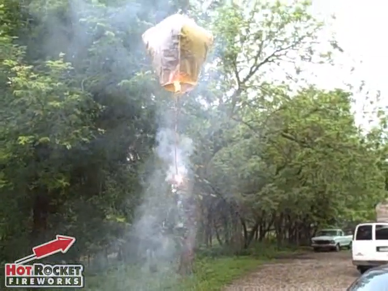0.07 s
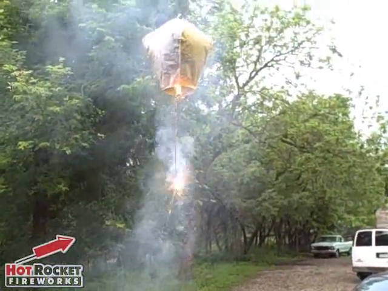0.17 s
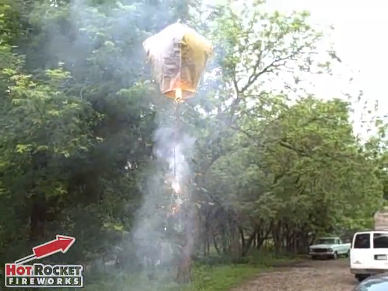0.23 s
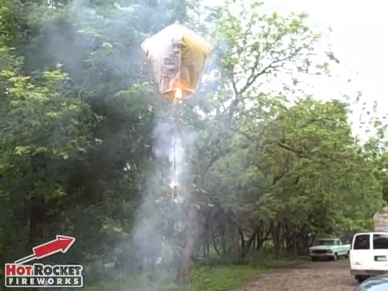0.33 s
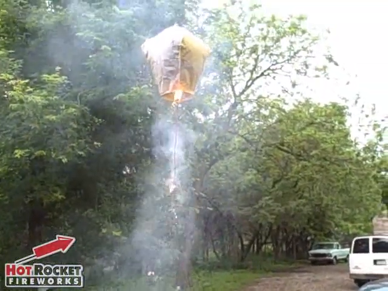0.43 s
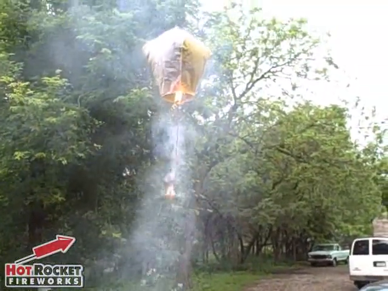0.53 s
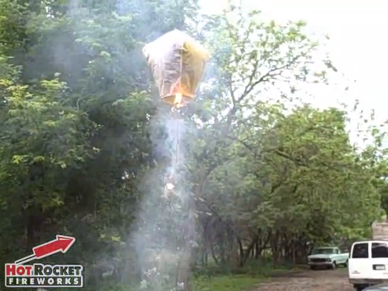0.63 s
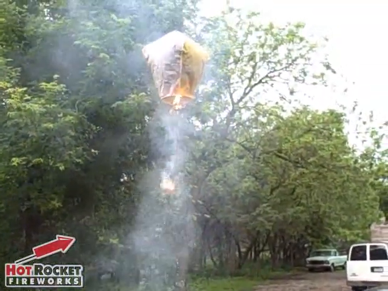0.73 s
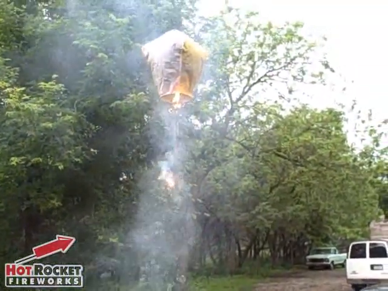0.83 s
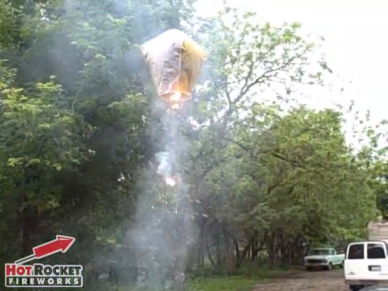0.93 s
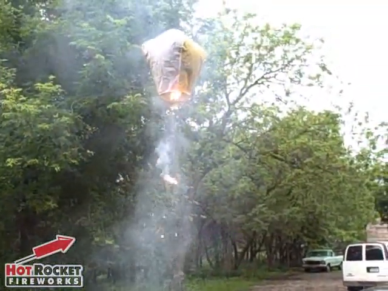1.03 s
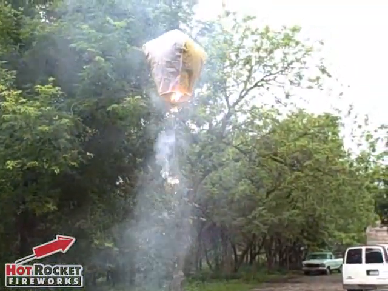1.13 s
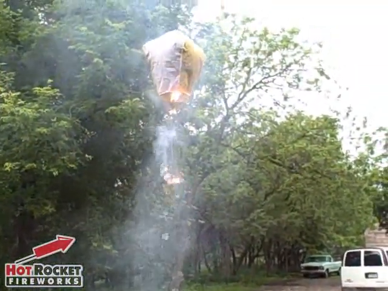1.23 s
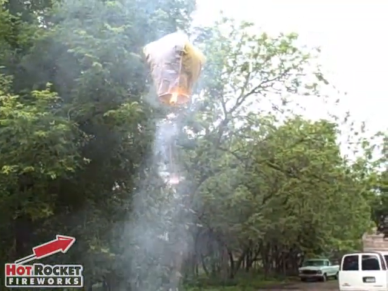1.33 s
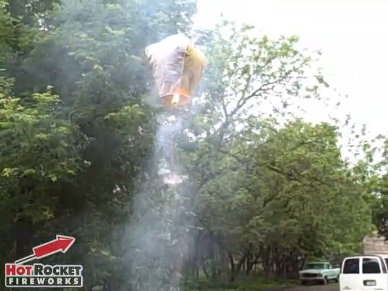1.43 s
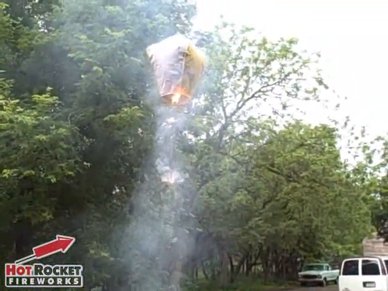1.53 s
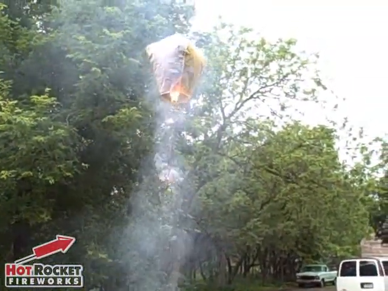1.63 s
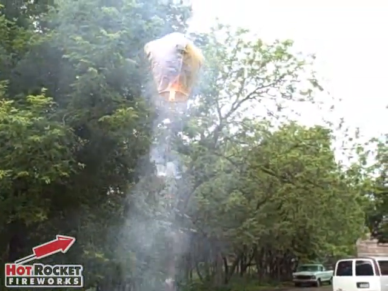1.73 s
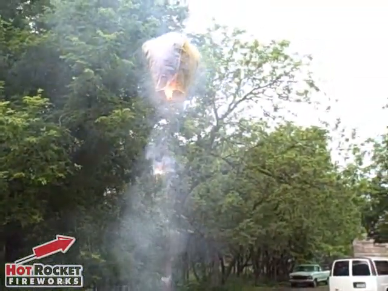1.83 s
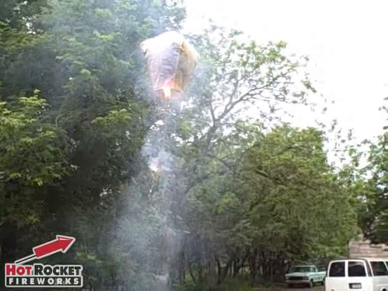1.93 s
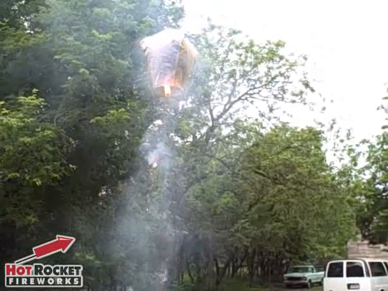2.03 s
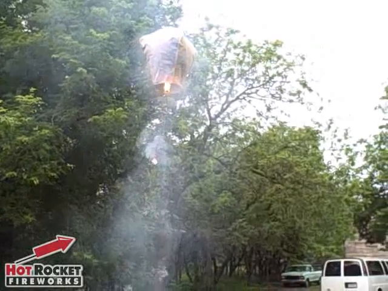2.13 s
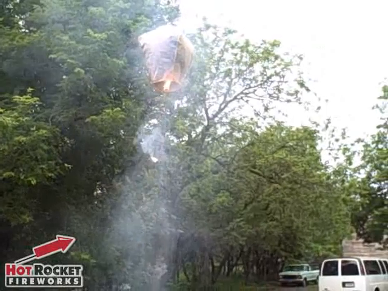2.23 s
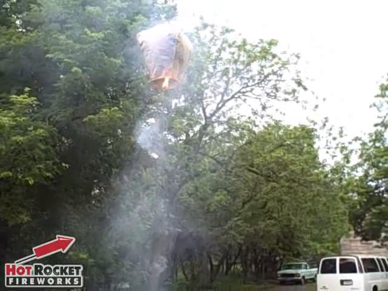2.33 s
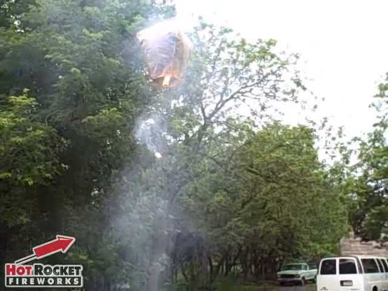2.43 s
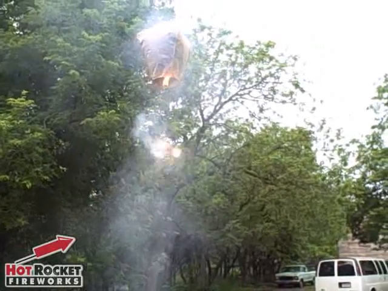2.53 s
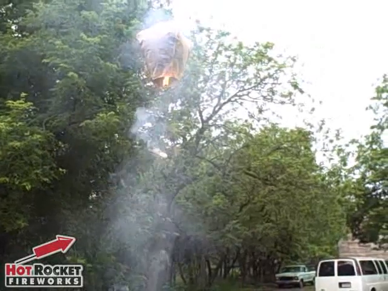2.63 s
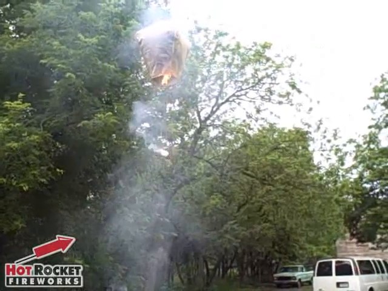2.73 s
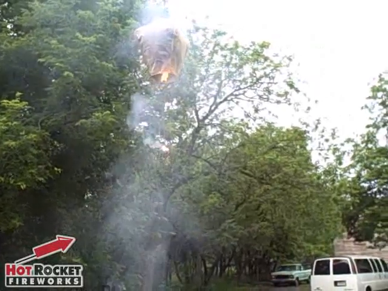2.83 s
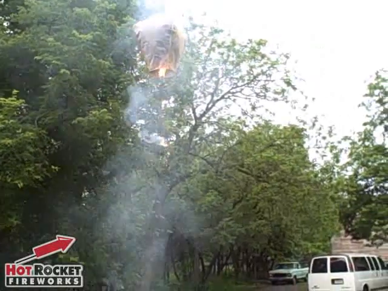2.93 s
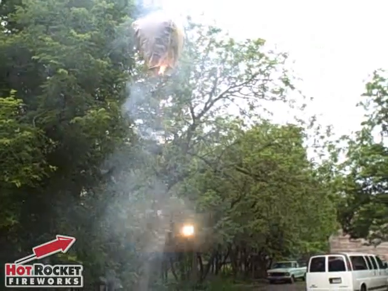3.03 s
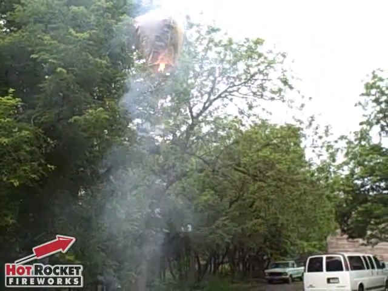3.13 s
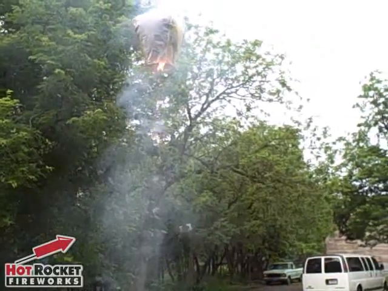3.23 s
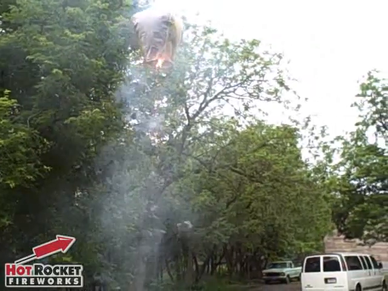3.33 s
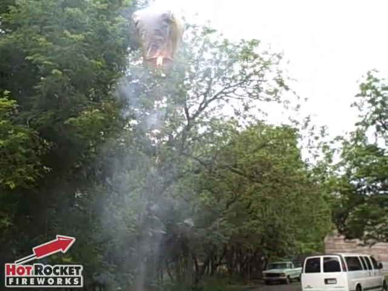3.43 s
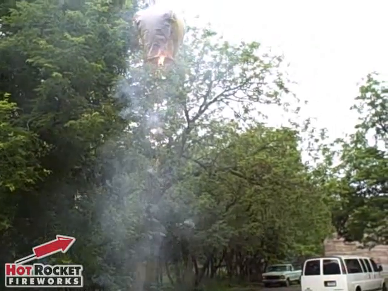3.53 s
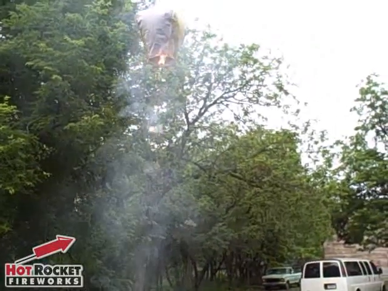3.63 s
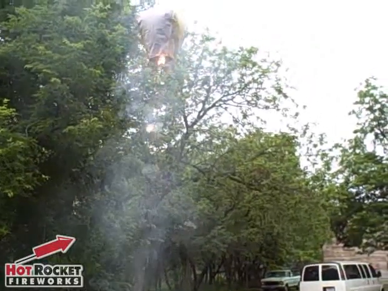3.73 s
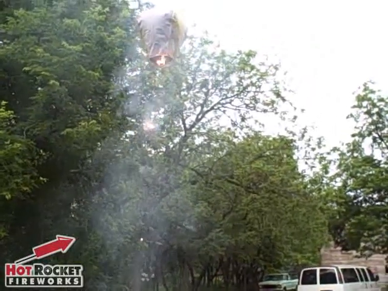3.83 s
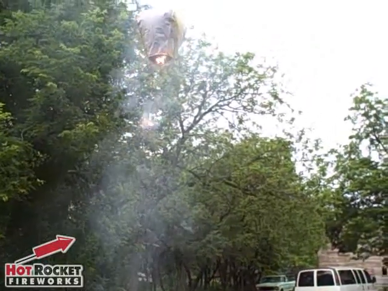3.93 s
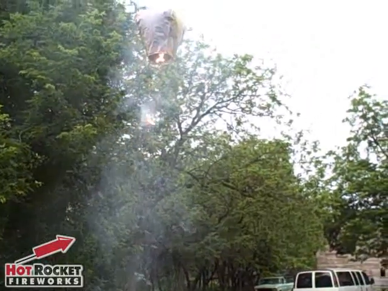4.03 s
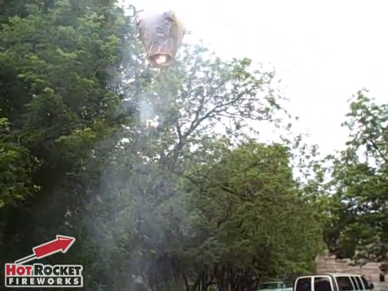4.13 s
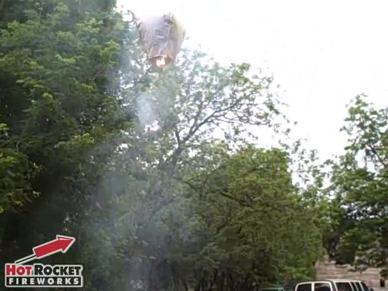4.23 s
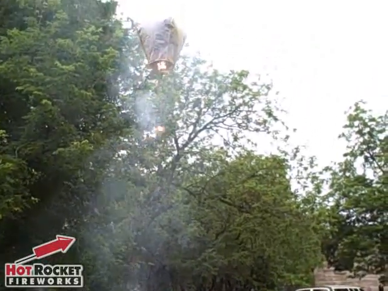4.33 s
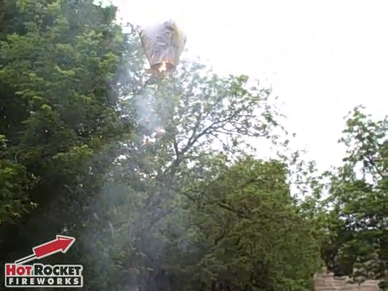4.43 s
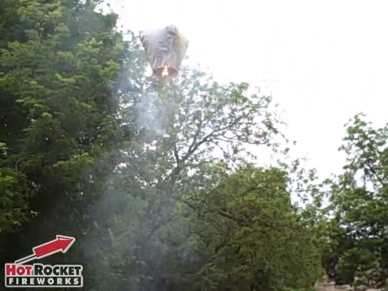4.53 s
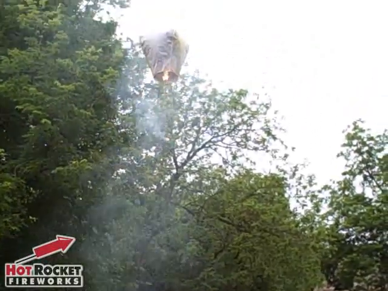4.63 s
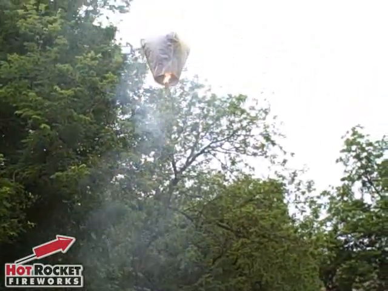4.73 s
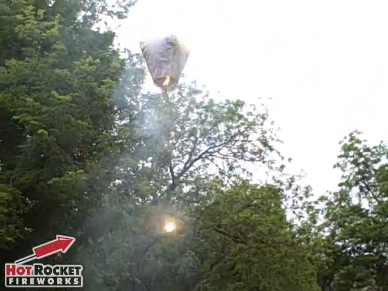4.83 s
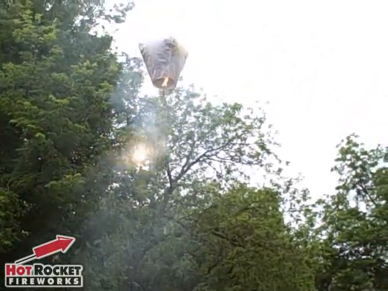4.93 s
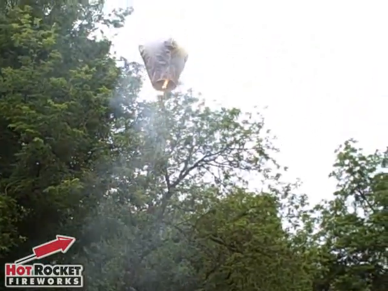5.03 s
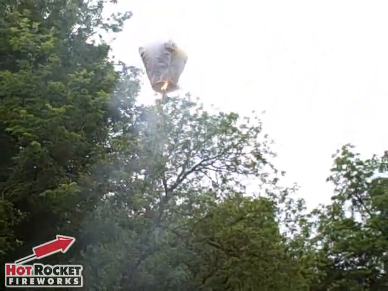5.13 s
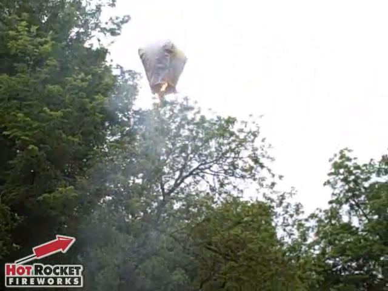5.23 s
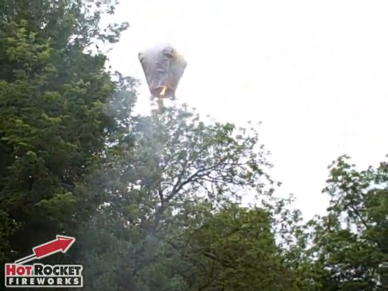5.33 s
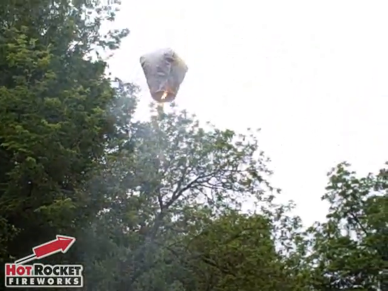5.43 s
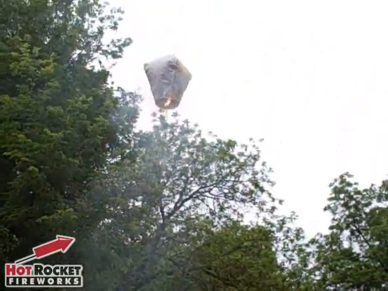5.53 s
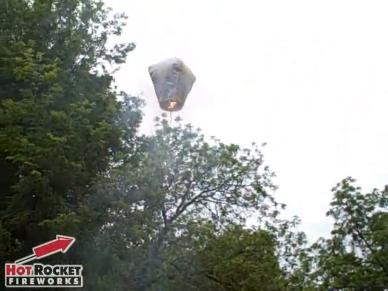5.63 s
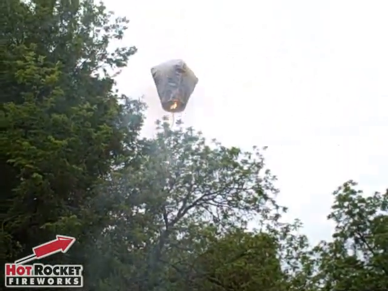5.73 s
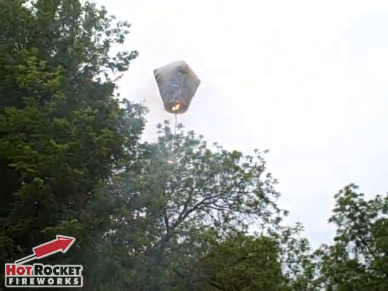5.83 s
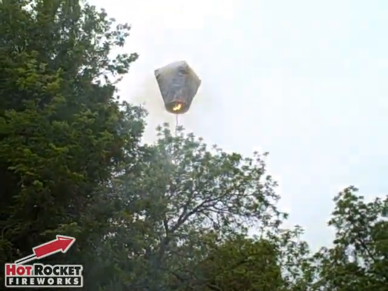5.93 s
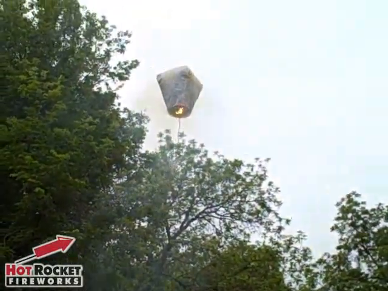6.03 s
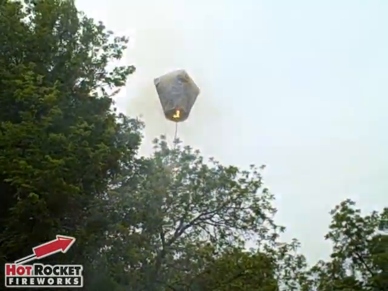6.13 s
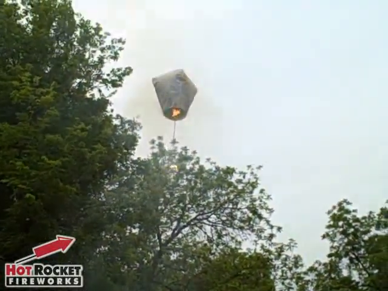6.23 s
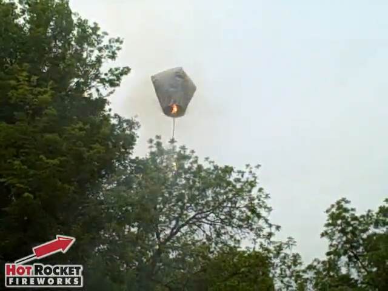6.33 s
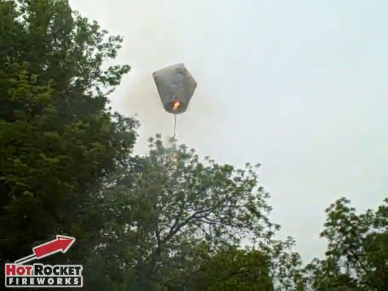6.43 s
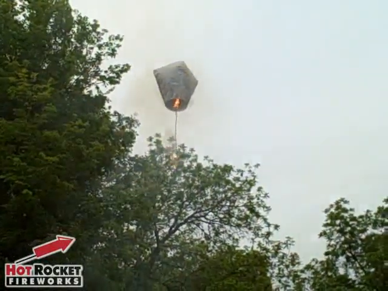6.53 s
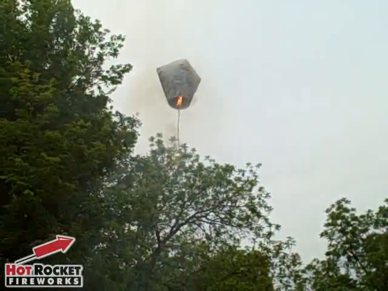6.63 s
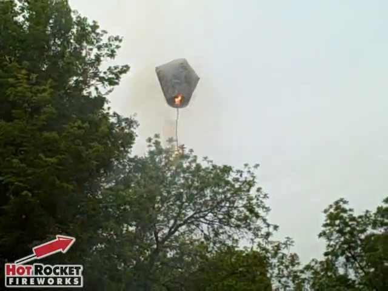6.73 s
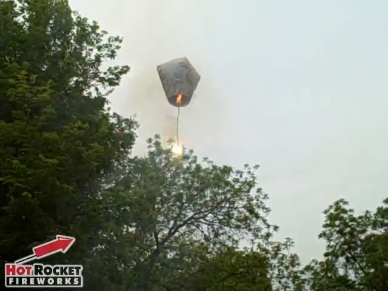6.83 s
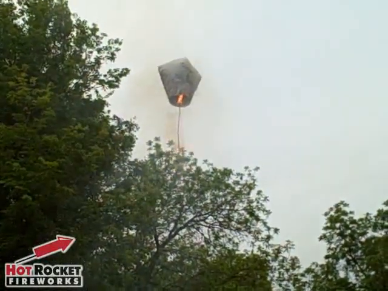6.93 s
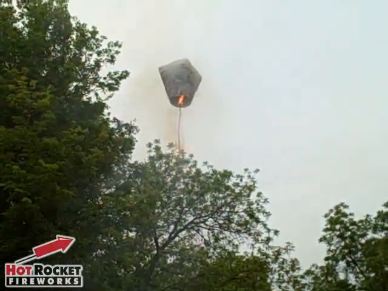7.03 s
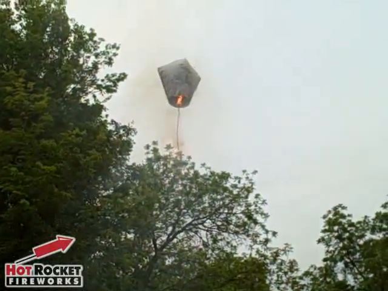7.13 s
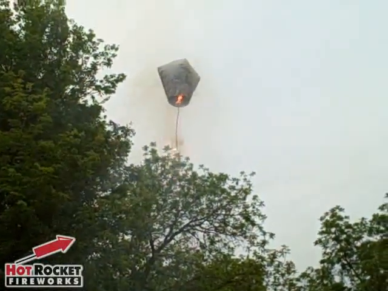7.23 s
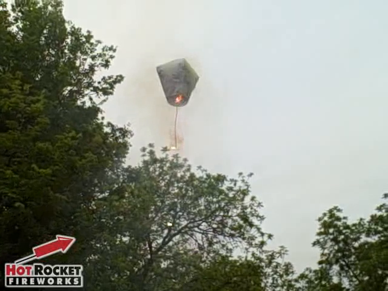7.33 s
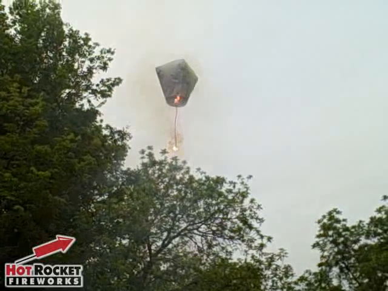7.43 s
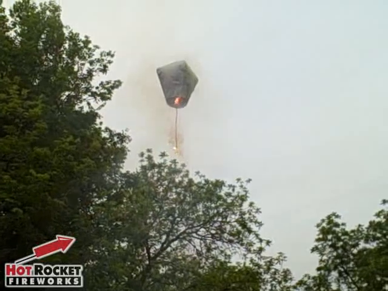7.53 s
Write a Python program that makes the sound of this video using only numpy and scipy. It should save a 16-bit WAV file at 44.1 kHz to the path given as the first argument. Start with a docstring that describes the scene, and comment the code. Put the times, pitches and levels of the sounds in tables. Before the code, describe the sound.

Dry, sharp firecracker pops crackle densely outdoors, thin to a brief gap, then resume sparsely with leafy echoes over low wind rumble.

```python
"""A crackling cord hangs under a paper lantern that climbs away between trees.
It opens in dense crackle over the strongest wind rumble, thins out to a gap just after 5 s, where a far
bird whistles briefly near 5.9 s, then crackles again to 7.5 s as the wind swells. Each charge sends in turn
a blast wave, its ground bounce with a soft thump, a hiss of leaf echoes (filtered noise, decaying by band)
and duller slaps from a near and a far obstacle. A faint noise hush lies below throughout."""
import sys
import numpy as np
from scipy import signal
from scipy.io import wavfile

SR = 44100
rng = np.random.default_rng(int(sys.argv[2]) if len(sys.argv) > 2 else 0)


def persist_wave(psi):
    """Save psi, clipped to +-1, as 16-bit WAV."""
    counts = np.round(np.clip(psi, -1, 1) * 32767).astype(np.int16)
    wavfile.write(sys.argv[1], SR, np.atleast_2d(counts).T)


N = 333837

# charges: (time [s], size as echo level [dB], front height [dB], treble re middle [dB],
#           ground bounce lag [ms], bounce re front [dB])
CHARGES = [(0.0254, -29.4, -2.0, -10, 3.69, -2), (0.05, -31.8, -5.4, -2, 3.42, -13),
           (0.0629, -27.3, -3.6, -11, 3.51, -2), (0.0708, -28.8, -2.4, -8, 1.89, 0),
           (0.077, -35.0, -6.4, -8, 4.0, -7), (0.085, -33.0, -3.6, -9, 3.99, -1),
           (0.111, -27.6, -2.1, -9, 1.35, 0), (0.1358, -34.1, -10.5, -6, 3.29, 2),
           (0.2216, -27.0, -0.7, -8, 1.0, -15), (0.2262, -30.0, 0.4, -5, 3.5, -15),
           (0.2387, -35.0, -4.7, -5, 3.98, -3), (0.3416, -35.8, -16.5, 5, 4.09, 3),
           (0.3808, -30.6, -3.9, -10, 2.76, -3), (0.3886, -39.0, -12.4, -5, 3.85, -2),
           (0.4356, -35.1, -9.0, -12, 3.76, 0), (0.5848, -31.7, -9.4, -4, 2.64, -2),
           (0.5981, -28.0, -3.8, -14, 4.19, 2), (0.5998, -31.0, -1.5, -11, 4.96, -10),
           (0.616, -28.6, -2.4, -11, 2.69, -1), (0.6361, -36.0, -6.5, -7, 3.44, -4),
           (0.684, -28.3, -2.2, -14, 2.56, -2), (0.7109, -38.0, -10.0, -4, 4.08, -1),
           (0.8207, -30.0, -4.7, -3, 1.0, -1), (0.829, -36.0, -6.7, -9, 3.45, -1),
           (0.8704, -48.0, -21.1, -3, 4.25, -3), (0.9463, -32.0, -6.9, -3, 4.3, 3),
           (0.9506, -33.0, -3.6, -6, 2.05, -4), (1.1984, -36.1, -9.6, -2, 3.86, -2),
           (1.3419, -38.0, -22.1, 10, 4.31, 3), (1.3694, -27.0, -1.1, -17, 3.45, -2),
           (1.3777, -35.0, -5.9, -11, 4.09, -6), (1.403, -31.5, -6.6, -8, 2.61, -3),
           (1.409, -37.0, -9.4, -5, 4.18, -5), (1.4298, -34.7, -7.9, -2, 4.57, -5),
           (1.539, -31.5, -3.0, -9, 3.47, -2), (1.6495, -46.4, -23.1, 7, 4.49, 0),
           (1.746, -32.0, -2.8, -12, 3.91, -4), (1.8941, -29.5, -1.2, -18, 2.82, -3),
           (1.9029, -38.0, -15.1, 1, 4.2, -2), (1.9088, -29.0, -0.5, -19, 2.8, -2),
           (1.9594, -35.6, -11.3, -3, 3.96, -1), (1.9658, -36.9, -10.5, -5, 3.96, -2),
           (2.1431, -28.9, -2.1, -12, 2.51, -1), (2.1732, -30.7, -6.1, -9, 1.0, 2),
           (2.2025, -31.4, -4.0, -10, 2.91, -5), (2.2351, -35.4, -15.6, 1, 1.37, 4),
           (2.2475, -34.7, -6.1, -5, 3.97, -2), (2.4607, -33.7, -5.1, -8, 4.02, -2),
           (2.6591, -34.9, -15.2, 8, 4.89, 4), (2.7142, -47.0, -19.9, -4, 4.54, 4),
           (2.7191, -41.0, -10.2, -12, 4.89, -5), (2.836, -34.5, -6.6, -4, 5.06, -6),
           (3.0863, -34.9, -11.7, -4, 4.85, -3), (3.1317, -32.6, -5.6, -9, 3.9, 0),
           (3.2234, -30.8, -6.9, -12, 3.54, 3), (3.2445, -30.3, -4.5, -11, 4.33, 0),
           (3.3259, -40.6, -17.4, 1, 5.1, 1), (3.3319, -49.0, -17.3, -12, 4.8, -9),
           (3.5603, -33.2, -9.6, -5, 4.84, 0), (3.6587, -36.1, -10.6, -6, 4.66, -3),
           (3.7268, -31.0, -2.7, -13, 2.13, -2), (3.7511, -41.9, -14.3, -1, 5.28, -7),
           (3.942, -30.7, -3.3, -12, 2.95, 0), (3.9531, -34.4, -9.1, -3, 5.43, -3),
           (3.9817, -38.6, -11.7, -6, 3.02, 1), (4.0548, -36.9, -12.5, -5, 5.42, -1),
           (4.2097, -52.8, -28.6, 1, 5.69, 0), (4.2966, -34.5, -7.4, -6, 4.51, -7),
           (4.3545, -32.8, -9.8, -7, 5.0, 1), (4.3895, -34.2, -8.7, -8, 5.3, 0),
           (4.4107, -37.4, -14.9, -5, 5.43, 0), (4.4448, -31.4, -2.3, -13, 4.16, -4),
           (4.4901, -42.4, -18.0, -2, 4.86, 1), (4.4958, -47.0, -19.9, -5, 4.87, -2),
           (4.546, -40.2, -14.1, -12, 5.7, -1), (4.7601, -41.1, -18.0, -1, 5.82, -1),
           (5.0233, -36.0, -11.0, -5, 4.69, -5), (5.0537, -40.1, -15.1, -14, 5.98, -2),
           (5.0745, -37.7, -9.1, -8, 5.96, -6), (5.1304, -42.0, -21.0, -1, 5.04, -2),
           (5.143, -44.4, -25.7, 5, 4.88, 0), (5.1693, -45.3, -17.8, -4, 5.98, -7),
           (5.9649, -26.2, -2.3, -9, 6.27, -3), (5.9677, -42.0, -16.2, -6, 5.91, -4),
           (6.0975, -49.4, -18.8, -11, 6.53, -6), (6.3657, -28.1, -1.0, -15, 6.23, -5),
           (6.3891, -37.0, -10.2, -1, 6.36, -4), (6.522, -28.0, -4.0, -11, 5.48, -2),
           (6.5666, -37.8, -10.3, -5, 6.33, -5), (6.6875, -53.0, -20.7, -12, 6.75, -7),
           (6.7311, -28.5, -2.1, -9, 6.35, -1), (6.7344, -32.0, -5.1, -4, 6.69, -5),
           (6.8526, -29.1, -1.9, -12, 6.05, -5), (6.8845, -29.7, -2.1, -12, 6.69, -4),
           (7.0206, -42.6, -16.6, -2, 6.84, -3), (7.1589, -34.4, -9.3, -8, 6.47, -1),
           (7.3113, -43.0, -13.6, -13, 6.5, -4), (7.477, -24.8, -3.1, -11, 4.88, 1),
           (7.5254, -29.7, -1.9, -11, 5.91, -4)]
# microphone rings struck by a steep front: (frequency [Hz], decay to 1/e [ms], level re treble [dB])
CAPSULE_RINGS = [(14600, .11, -1), (8200, .15, -9)]
# leaf echo colour, relative: (frequency [Hz], level [dB per Hz])
LEAF_COLOUR = [(35, -43), (60, -7), (290, -4), (403, -4), (1010, -5.5), (2040, -3), (2290, -1.5),
               (2900, -5.5), (6760, -4), (15000, -4), (16500, -25)]
# decay of the near crowns: (frequency [Hz], T60 [s])
NEAR_DECAY = [(100, 0.068), (700, 0.17), (2000, 0.1), (5000, 0.33), (13000, 0.19)]
# decay of the far woods: (frequency [Hz], T60 [s])
FAR_DECAY = [(100, .55), (700, 0.83), (2000, 0.89), (5000, 0.93), (13000, 0.54)]
# far woods re near crowns: (frequency [Hz], level [dB])
FAR_LEVEL = [(100, -16), (1000, -15), (4000, -11), (13000, -14.5)]
# obstacles: (slap delay at the start [ms], delay change [ms per s], peak re size [dB],
#             peak change [dB per s], band reference [Hz])
SLAP_OBSTACLES = [(23.9, -.47, 12.0, -.9, 2200), (93.2, -1.55, 4.5, -.2, 4200)]
# wind colour, relative: (frequency [Hz], level [dB per Hz])
WIND_COLOUR = [(12, -30), (20, -3), (48, -2.5), (77, -6), (102, -15.5), (130, -16), (300, -27),
               (390, -68.5), (660, -120)]
# mean wind level: (time [s], level [dB])
WIND_GUSTS = [(0.0, -56), (0.42, -65), (0.84, -65), (1.01, -72), (1.92, -69), (2.07, -66), (2.44, -76),
              (3.27, -71), (3.44, -73), (4.49, -70), (4.68, -74), (5.74, -74), (5.92, -69), (6.68, -64),
              (7.12, -68), (7.57, -64)]
# distant outdoor noise colour, relative: (frequency [Hz], level [dB per Hz])
HUSH_COLOUR = [(88, -30), (150, -6.5), (560, -14), (1230, -13.5), (2810, -16.5), (3490, -12), (6170, -21),
               (15000, -23), (16500, -26)]
# far bird: (time [s], pitch [Hz], mean level [dB])
BIRD_WHISTLE = [(5.83, 2050, -92), (5.86, 2045, -84), (5.93, 2030, -85), (5.96, 2030, -92)]

LEAD_SAMPLES = 8    # shapes start this far ahead of their moment
FRONT_MS, TURN_MS, SUCTION_GAIN = .022, .048, 1.0
BIG_SIZE_DB = -30
USUAL_BODY_DB = -28    # size re front height; a fuller charge has more body behind its front
# big, full charges pull back longer
SUCTION_MS, SUCTION_MS_PER_DB, SUCTION_MS_PER_FULL_DB, SUCTION_LOG_SPREAD = .08, .0015, .003, .12
EARLIER_DB = -30    # scatter left over from charges before the start
SLAP_DELAY_SPREAD, SLAP_SPREAD_DB, SLAP_BAND_LOG_SPREAD = .006, 1.5, .12    # first is a share of the delay
HUSH_DB = -74
HOUSING_ECHO, CUTOFF_HZ = 0.12, 16700    # echo as a share of the direct sound


def cracks():
    """Each charge's direct blast, its more ragged ground bounce and a soft thump of hot gas."""
    s, size_db, front_db, treble_db, lag_ms, bounce_db = np.transpose(CHARGES)
    bigger_db = np.maximum(size_db - BIG_SIZE_DB, -14)
    fuller_db = np.clip(size_db - front_db - USUAL_BODY_DB, -6, 6)
    suction_ms = SUCTION_MS + SUCTION_MS_PER_DB * bigger_db + SUCTION_MS_PER_FULL_DB * fuller_db
    suction_ms = suction_ms * np.exp(SUCTION_LOG_SPREAD * rng.standard_normal(len(s)))
    height = from_db(front_db)[:, None]
    ripple = .08 + from_db(size_db - front_db + 8)[:, None]    # fuller charges burst raggedly
    direct = place(s, height * blast(s, 0.93 * suction_ms, ripple, treble_db))

    bounce_s = s + lag_ms / 1000
    bounce_height = height * from_db(bounce_db)[:, None]
    bounce_shape = blast(bounce_s, 0.71 * suction_ms, 1.9 * ripple, treble_db - 3.0)
    bounce = place(bounce_s, bounce_height * bounce_shape)

    gas = place(s + 12 / SR, from_db(size_db - 2.0)[:, None])
    thump = signal.lfilter([1], [1, -np.exp(-1 / (0.0014 * SR))], gas)    # 1.4 ms decay
    return direct + bounce + thump


def blast(seconds, suction_ms, ripple, treble_db, count=64):
    """A steep short push, a longer pull back and a ragged wake; the microphone turns it over."""
    fraction = (seconds * SR % 1)[:, None]
    ms = (np.arange(count) - LEAD_SAMPLES - fraction) / SR * 1000
    push = np.exp(-.5 * (ms / FRONT_MS) ** 2)
    after_ms = ms - TURN_MS
    opens = .5 + .5 * np.tanh(after_ms / FRONT_MS)
    late_ms = np.maximum(after_ms, 0)
    pull = SUCTION_GAIN * opens * np.exp(-late_ms / suction_ms[:, None])
    wake = ripple * opens * rng.standard_normal(ms.shape) * np.exp(-late_ms / .3)
    struck = .5 + .5 * np.tanh((ms + FRONT_MS) / FRONT_MS)
    ring = 0
    for hz, decay_ms, level_db in CAPSULE_RINGS:
        decay = np.exp(-np.maximum(ms, 0) / decay_ms)
        ring = ring + from_db(treble_db[:, None] + level_db) * np.cos(2 * np.pi * hz * ms / 1000) * decay
    return pull + wake - push - struck * ring


def leaves():
    """Countless small echoes: a little at once, most after the bounce, dying band by band."""
    s, size_db, _, _, lag_ms, _ = np.transpose(CHARGES)
    start_s = s + LEAD_SAMPLES / SR    # cancels the lead in place()
    power = from_db(2 * (size_db + .5))[:, None]
    after_bounce = place(start_s + lag_ms / 1000 + .0004, power)
    at_once = from_db(-10) * place(start_s + .0018, power)
    kicks = signal.lfilter([.04], [1, -.96], after_bounce + at_once)    # echoes take a moment to pile up
    earlier = from_db(2 * EARLIER_DB) * (np.arange(N) == 0)

    fresh = power_decay(kicks, 0.023) / (power_decay(kicks, 0.21) + 1e-12)
    fresh = np.clip(fresh, 0, 1)    # near 1 just after a charge
    sizes = np.minimum(rng.exponential(1, (2, N)), 6) - 1.5
    glints = from_db((3.5 + 2.4 * fresh) * sizes)    # near branches throw single louder echoes
    grains = rng.standard_normal((2, N)) * glints

    out, total_power = 0, 0
    for hz, noise in bands(grains / grains.std()):
        gain = from_db(at_hz(LEAF_COLOUR, hz))
        near = power_decay(kicks, at_hz(NEAR_DECAY, hz))
        far = power_decay(kicks + earlier, at_hz(FAR_DECAY, hz))
        echo_power = near + from_db(2 * at_hz(FAR_LEVEL, hz)) * far
        patches = from_db(2.2 * drift(60) + 1.6 * drift(220))    # each crown favours other pitches
        out = out + gain * patches * noise * np.sqrt(echo_power)
        total_power += gain ** 2 * noise.var()
    return out / np.sqrt(total_power)


def power_decay(kicks, t60_s):
    """Every kick of power dies away by 60 dB in t60_s."""
    return signal.lfilter([1], [1, -from_db(-120 / (t60_s * SR))], kicks + 1e-18)


def slaps():
    """Each obstacle returns every charge as a smeared, band-limited blast, then its weaker ground bounce."""
    out = np.zeros(N + SR)
    ms = np.arange(600) / SR * 1000
    s, size_db, *_ = np.transpose(CHARGES)
    for delay_ms, ms_per_s, peak_re_size_db, db_per_s, band_hz in SLAP_OBSTACLES:
        jitter, level, colour = rng.standard_normal((len(s), 3)).T
        back_s = s + (delay_ms + ms_per_s * s) * (1 + SLAP_DELAY_SPREAD * jitter) / 1000
        starts = (back_s * SR).astype(int)
        gains = from_db(size_db + peak_re_size_db + db_per_s * s + SLAP_SPREAD_DB * level)
        bands_hz = band_hz * np.exp(SLAP_BAND_LOG_SPREAD * colour)
        smears = rng.standard_normal((len(s), len(ms))) * np.exp(-ms / 1.34)
        for at, gain, hz, smear in zip(starts, gains, bands_hz, smears):
            sos = signal.butter(2, [hz / 2.9, hz * 1.72], "band", fs=SR, output="sos")
            slap = signal.sosfilt(sos, 0.25 * smear - (ms == 0))
            slap = slap / np.abs(slap).max()
            bounce = from_db(-9.5) * np.roll(slap, 195)    # 4.4 ms later
            out[at:at + len(ms)] += gain * (slap + bounce)
    return out[:N]


def wind():
    """Low rumble: coloured noise whose level follows the gusts and flutters."""
    level_db = np.interp(np.arange(N) / SR, *np.transpose(WIND_GUSTS)) + 3.5 * drift(15)
    return from_db(level_db) * coloured(WIND_COLOUR)


def bird():
    """One thin distant whistle: a sine with gliding pitch and wavering level."""
    now = np.arange(N) / SR
    s, hz, level_db = np.transpose(BIRD_WHISTLE)
    whistle = np.sin(2 * np.pi * np.cumsum(np.interp(now, s, hz)) / SR)
    return from_db(np.interp(now, s, level_db, left=-200, right=-200) + 5 * drift(70)) * whistle


def hush():
    """Distant outdoor noise: coloured noise with a slightly drifting level."""
    return from_db(HUSH_DB + 1.0 * drift(9)) * coloured(HUSH_COLOUR)


def coloured(spectrum):
    """Steady noise of a given colour, rms 1."""
    white = rng.standard_normal((2, N))
    return rms_one(sum(from_db(at_hz(spectrum, hz)) * noise for hz, noise in bands(white)))


def bands(white):
    """Half-octave bands of noise with their centres [Hz]; neighbours get unrelated noise."""
    edges_hz = 22 * 2 ** np.arange(0, 9.9, .5)
    for k, (low, high) in enumerate(zip(edges_hz, edges_hz[1:])):
        sos = signal.butter(2, [low, high], "band", fs=SR, output="sos")
        yield np.sqrt(low * high), signal.sosfilt(sos, white[k % 2])


def drift(rate_hz):
    """Slow chance: straight lines between random knots of spread 1."""
    knots = rng.standard_normal(int(N / SR * rate_hz) + 2)
    return np.interp(np.arange(N) / SR * rate_hz, np.arange(len(knots)), knots)


def place(seconds, shapes):
    """Sum short shapes into a track, each LEAD_SAMPLES ahead of its moment."""
    starts = (seconds * SR).astype(int)[:, None] - LEAD_SAMPLES
    at = starts + np.arange(shapes.shape[1])
    inside = at < N
    return np.bincount(at[inside], shapes[inside], N)


def at_hz(points, hz):
    """Read a table at a frequency, linear over log frequency."""
    table_hz, values = np.transpose(points)
    return np.interp(np.log(hz), np.log(table_hz), values)


def from_db(db):
    """Decibels to amplitude ratio."""
    return 10 ** (np.asarray(db) / 20)


def rms_one(x):
    """Scale to rms 1."""
    return x / np.sqrt(np.mean(x ** 2) + 1e-20)


def scene():
    """All sources at one microphone."""
    return (cracks() + leaves() + slaps() + wind() + bird() + hush())[None]


def record(dry):
    """The housing adds a very short echo, the loudest peaks are rounded, the top is cut without delay."""
    heard = signal.lfilter([1, 0, HOUSING_ECHO], [1], dry) / (1 + HOUSING_ECHO)
    ceiling = 1.2
    rounded = ceiling * np.tanh(heard / ceiling)
    low_pass = signal.cheby2(10, 32, CUTOFF_HZ, fs=SR, output="sos")
    return signal.sosfiltfilt(low_pass, rounded)


dry = scene()
out = record(dry)
persist_wave(out)
```